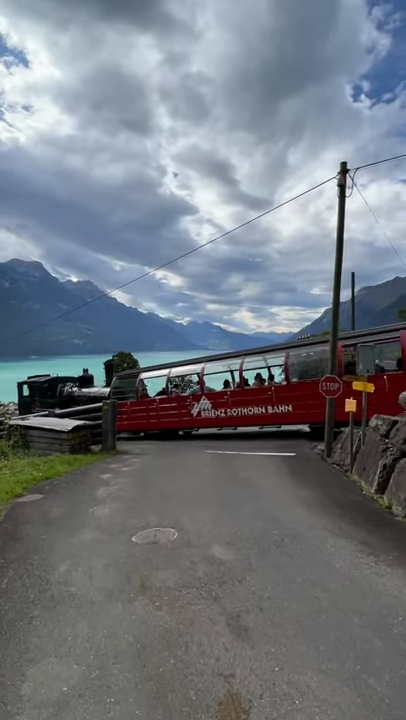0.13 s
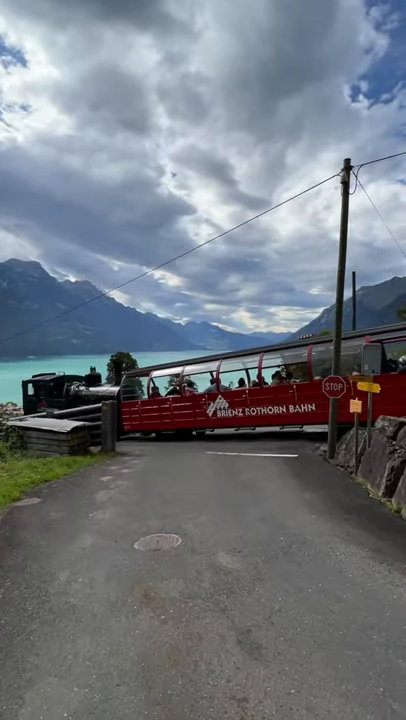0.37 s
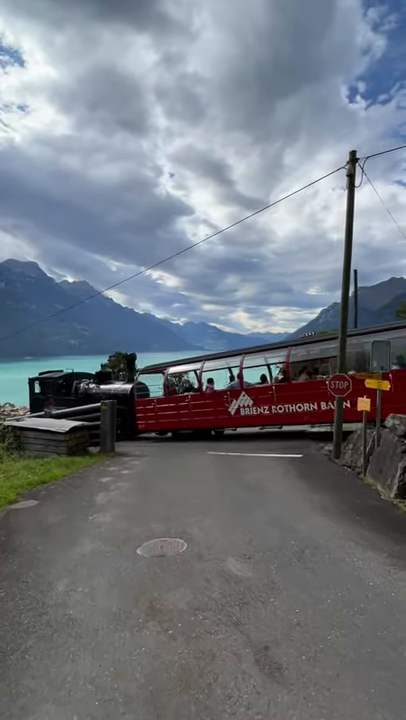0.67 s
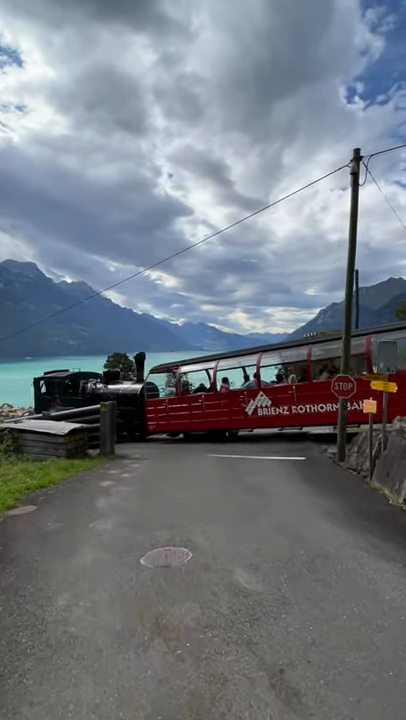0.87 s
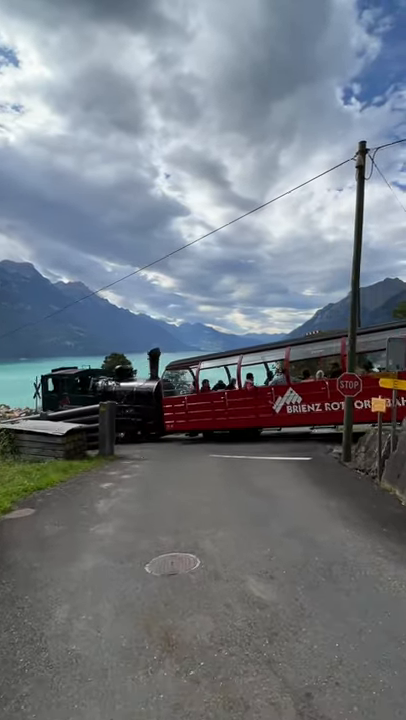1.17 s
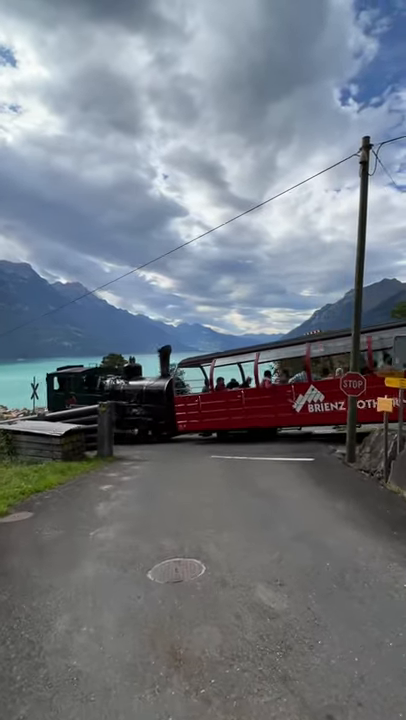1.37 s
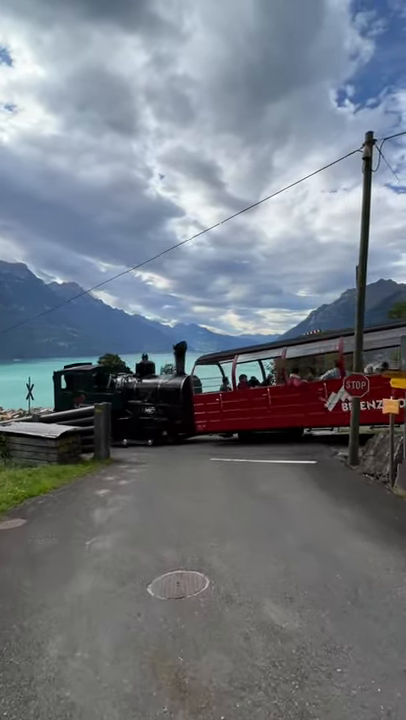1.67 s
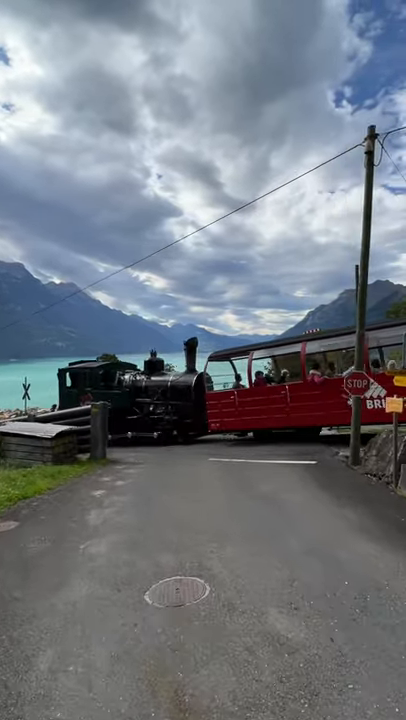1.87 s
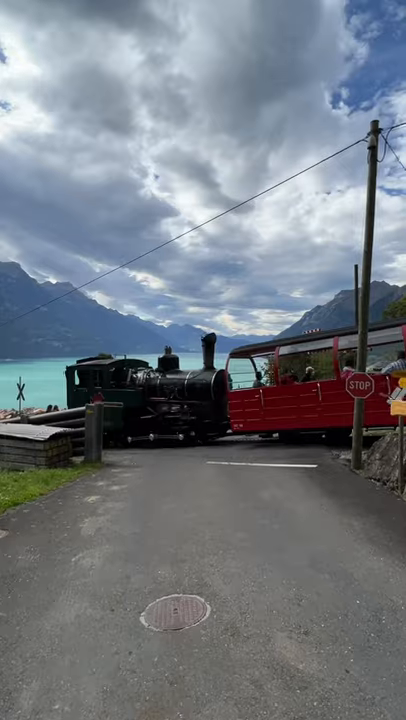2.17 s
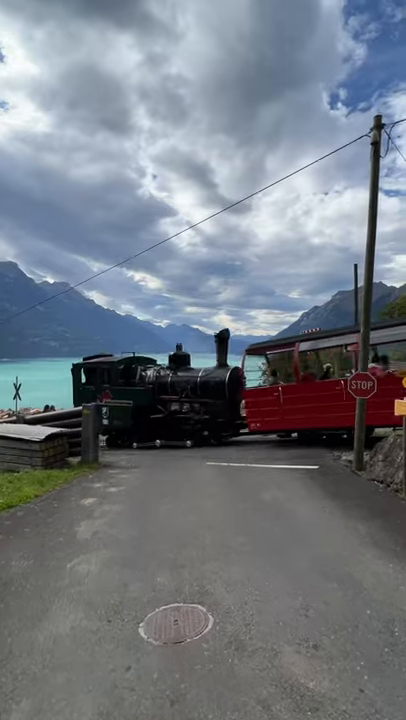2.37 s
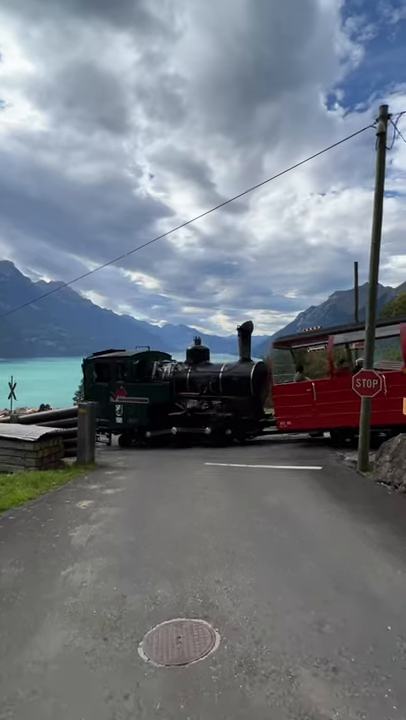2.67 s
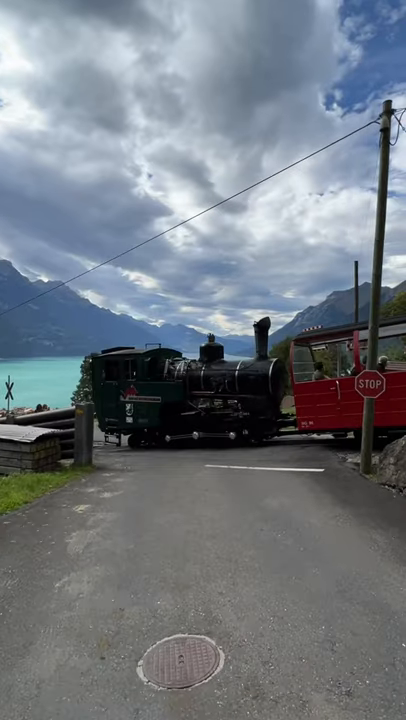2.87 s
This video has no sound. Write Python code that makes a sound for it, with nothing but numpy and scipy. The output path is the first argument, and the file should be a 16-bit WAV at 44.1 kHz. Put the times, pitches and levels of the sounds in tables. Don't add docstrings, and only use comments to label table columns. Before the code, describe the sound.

Fast, uneven-accented steam chuffs run without a break, about thirteen each second, while wheels and rods rumble and steam leaks underneath; open road crossing, nearby stereo handheld microphone, with a faint dull road reflection.

```python
import sys
import numpy as np
from scipy import signal
from scipy.fft import rfft, irfft
from scipy.io import wavfile
from scipy.ndimage import uniform_filter1d, minimum_filter1d

SR = 44100
rng = np.random.default_rng(int(sys.argv[2]) if len(sys.argv) > 2 else 0)


def master(y):
    cut = np.clip(np.atleast_2d(y).T, -1, 1)
    pcm = np.round(cut * 32767)
    wavfile.write(sys.argv[1], SR, pcm.astype(np.int16))


def gain_from_decibels(decibels):
    exponent = np.asarray(decibels, float) / 20
    return 10 ** exponent


N = 132741

# start in seconds, jet level in dB, bark level in dB, chimney overtone in dB, frame shake in dB.
EARLY_BEATS = [(0.0257, -9.5, -14.5, -10, -12.5), (0.1013, -17.5, -23.5, -16.5, -26),
               (0.176, -17.5, -20.5, -20, -45), (0.2534, -13, -7, -11, -35), (0.328, -9, -12, -9, -35),
               (0.402, -15.5, -23, -13, -24), (0.4781, -15.5, -17, -18, -32),
               (0.556, -10.5, -8.5, -10, -35), (0.631, -8, -12.5, -10.5, -42),
               (0.704, -16.5, -23.5, -28, -29), (0.779, -15.5, -30, -21, -26),
               (0.8585, -10, -11.5, -10.5, -36), (0.934, -9.5, -11, -19, -33), (1.0012, -20, -19, -28, -26),
               (1.0767, -17.5, -41, -19, -22), (1.1527, -8, -17, -10, -31), (1.2286, -8, -17.5, -7, -13.5),
               (1.299, -17, -25.5, -42, -23), (1.376, -15.5, -17, -40, -26),
               (1.4501, -9.5, -10.5, -26, -29)]
LATE_BEATS = [(1.5257, -8, -15, -9.5, -18), (1.5966, -16.5, -23, -36, -16),
              (1.6677, -14.5, -26.5, -17.5, -47), (1.7482, -9.5, -13.5, -15.5, -25),
              (1.818, -8, -20.5, -12, -20), (1.8903, -15.5, -29, -33, -44), (1.9635, -17, -31, -35, -28),
              (2.0427, -9.5, -18.5, -20, -43), (2.1165, -9, -14.5, -17.5, -35),
              (2.19, -20.5, -24, -14.5, -30), (2.261, -17.5, -40, -41, -17), (2.3405, -12.5, -15, -16, -35),
              (2.4144, -11, -17, -11, -22), (2.4901, -14, -35, -20, -31), (2.5648, -16, -25, -19.5, -14),
              (2.6419, -10, -23, -16, -42), (2.72, -9, -42, -25, -7), (2.797, -16.5, -23.5, -24, -43),
              (2.8725, -14, -21, -43, -45), (2.955, -9, -42, -40, -11)]
BEATS = [*EARLY_BEATS, *LATE_BEATS]


def evened(x):
    return x / np.sqrt(np.mean(x ** 2) + 1e-20)


def along(points):
    s, value = np.transpose(points)
    return np.interp(np.arange(N) / SR, s, value)


def read(points, hz):
    f, value = np.transpose(points)
    return np.interp(np.log(hz + 1), np.log(f + 1), value)


def colour(x, points):
    return irfft(rfft(x) * gain_from_decibels(read(points, np.fft.rfftfreq(N, 1 / SR))), N)


def resonate(x, hz, width):
    turn = np.exp(2j * np.pi * np.cumsum(hz * np.ones(N)) / SR)
    r = np.exp(-np.pi * width / SR)
    return 2 * (turn * signal.lfilter([1 - r], [1, -r], x / turn)).real


def wander(size):
    return evened(uniform_filter1d(uniform_filter1d(rng.standard_normal(N), size), size))


def puff(t, rise, fall):
    return np.sin(np.pi / 2 * np.clip(t / rise, 0, 1)) ** 2 * gain_from_decibels(-fall * np.maximum(t - rise, 0))


def beats(part, shape):
    # lead in seconds, rise in seconds, jet fall in dB per second, thump delay in seconds.
    valves = [
        (0.011, 0.018, 402, 0.0002),
        (0.011, 0.02, 367, -0.0015),
        (0.013, 0.017, 346, -0.0005),
        (0.011, 0.018, 417, 0.0003),
    ]
    # delay in seconds, rise in seconds, clear ring in dB.
    strikes = [(0.0037, 0.0049, 7.5), (0.0075, 0.012, 8.5), (0.0042, 0.015, 3), (0.0019, 0.0057, 1)]
    # thump in dB, hiss tilt in dB.
    blows = [(-13.5, 1), (-25, 3.3), (-20.5, -0.5), (-16.5, -0.3), (-17, -1), (-19, 1.8), (-17.5, 0),
             (-13.5, -0.8), (-15.5, 0.5), (-21, 0.5), (-18, -0.3), (-13, -0.4), (-20, -0.2), (-15.5, 4.2),
             (-19, 2), (-16.5, -3.5), (-22, 0.3), (-19, 3.5), (-29, -0.1), (-15.5, -0.2), (-18, -1.2),
             (-23, .1), (-30, -1.2), (-14, -3.4), (-24, -0.4), (-25, -1.5), (-17.5, 1), (-19, -5),
             (-13.5, -1.2), (-23, 3.5), (-20.5, .1), (-19.5, 1.8), (-16.5, 3.7), (-27, -3.8), (-20, .1),
             (-27, -0.3), (-19, 2), (-18, -0.8), (-22, -1.7), (-24, -4.5)]
    names = ("lead", "rise", "fall", "thump_delay", "ring_delay", "ring_rise", "ring_db")
    out, t = np.zeros(N + SR), np.arange(SR // 4) / SR
    for k, (start, jet_db, bark_db, overtone_db, shake_db) in enumerate(BEATS):
        valve = dict(zip(names, (*valves[k % 4], *strikes[k % 4])))
        thump_db, tilt_db = blows[k]
        level = dict(jet=jet_db, bark=bark_db, overtone=overtone_db, shake=shake_db,
                     thump=thump_db, treble=jet_db + tilt_db)[part]
        at = round((start - valve["lead"]) * SR)
        out[at:at + len(t)] += gain_from_decibels(level) * shape(t, valve)
    return out[:N]


def hums():
    # pitch in Hz, width in Hz, level in dB, loudest moment in seconds, span in seconds.
    hum_modes = [(40.8, 14, -6.5, 0.6, 2.25), (49.6, 41, -10, 0.66, 1.96), (205, 31.4, -10.5, 1.62, 0.8),
                 (304, 53, -10.5, 2.12, 1.35), (422, 84, -8, 2.25, 0.78), (1280, 170, -42, 0.33, 0.53),
                 (2480, 490, -19.5, .3, 2.4)]
    t, out = np.arange(N) / SR, 0
    for hz, width, db, loudest, span in hum_modes:
        noise = rng.standard_normal((2, N))
        fuzz = evened(resonate(resonate(noise, hz, width), hz, width))
        out = out + gain_from_decibels(db + 1) * np.exp(-.5 * ((t - loudest) / span) ** 2) * fuzz
    return out


def wash():
    # frequency in Hz, level in dB.
    gear_spectrum = [(50, -3), (150, -7), (300, -13.5), (1200, -16), (2600, -38), (5000, -36.5),
                     (10000, -43), (15500, -42.5)]
    frames = N // 256 + 5
    a, b, c, d, patches = rng.standard_normal((frames, 513, 5)).T
    patches = evened(uniform_filter1d(uniform_filter1d(patches, size=10, axis=0), size=6, axis=1))
    z = np.array([a + 1j * b, c + 1j * d]) * gain_from_decibels(3.5 * patches)
    rumble = evened(colour(signal.istft(z, nperseg=1024, noverlap=768)[1][:, :N], gear_spectrum))
    leak_hz, leak_rise_db, spit_db = 2220, 4.5, 0.5
    leak = signal.sosfiltfilt(signal.butter(2, leak_hz, "high", fs=SR, output="sos"), rumble)
    leak_gain = gain_from_decibels(leak_rise_db * np.arange(N) / N + spit_db * wander(150))
    return rumble + (leak_gain - 1) * leak


def gear():
    # time in seconds, level in dB.
    gear_level = [(0, -23), (.5, -26.5), (1.0, -24.5), (1.5, -25), (2.0, -25), (2.5, -24), (3.0, -26)]
    drone_hz, drone_width_hz, drone_db, drone_fade_db = 148, 5.6, -5.5, -8.5
    drone = evened(resonate(rng.standard_normal((2, N)), drone_hz, drone_width_hz))
    drone = gain_from_decibels(drone_db + drone_fade_db * np.arange(N) / N) * drone
    shake = 1 + 3.7 * beats("shake", lambda t, v: puff(t, 0.0037, 230))
    hum_surge = 1 + 2.3 * beats("jet", lambda t, v: puff(t, 0.016, 300))
    return shake * gain_from_decibels(along(gear_level) - 1.5) * (wash() + drone + hums() * hum_surge)


def road(x):
    # time in seconds, echo delay in seconds.
    echo_delay = [(0, 0.0014), (1.5, 0.00195), (3.0, 0.002595)]
    echo, echo_hz = 0.41, 1720
    dull = signal.lfilter(*signal.butter(1, echo_hz, fs=SR), x)
    at = np.arange(N) - along(echo_delay) * SR
    return x + echo * np.array([np.interp(at, np.arange(N), v) for v in dull])


def pipe():
    # pitch in Hz, 60 dB decay in seconds, level in dB, first swing in seconds,
    # swell lead in seconds, swell in seconds.
    chimney_modes = [
        (54, 0.17, 2.5, .0001, 0.0027, 0.0073),
        (146.5, 0.17, -3, .0023, 0.0052, 0.0097),
    ]

    def ring(hz, t60, db, first, lead, swell):
        def shape(t, v):
            since = t - v["lead"] - v["thump_delay"]
            swing = np.sin(2 * np.pi * hz * (since - first))
            return -gain_from_decibels(db) * puff(since + lead, swell, 60 / t60) * swing
        return shape

    return beats("thump", ring(*chimney_modes[0])) + beats("overtone", ring(*chimney_modes[1]))


def bark():
    nozzle_pitch = [570, 629, 640, 580, 570, 624, 576, 570, 655, 630, 560, 554, 525, 549, 565, 500, 522,
                    470, 549, 527, 580, 420, 560, 500, 580, 560, 420, 500, 505, 403, 420, 425, 409, 290,
                    285, 490, 450, 295, 290, 420]
    level_db, width_hz, burst_fall, ring_fall = 2, 343, 430, 1060
    ring_spread = 0.05015
    hz = along([(row[0] + s, pitch) for row, pitch in zip(BEATS, nozzle_pitch) for s in (-.01, .03)])

    def burst_shape(t, v):
        return puff(t - v["ring_delay"], v["ring_rise"], burst_fall)

    def ring_shape(t, v):
        return gain_from_decibels(v["ring_db"]) * puff(t - v["ring_delay"], v["ring_rise"], ring_fall)

    burst = rng.standard_normal((2, N)) * beats("bark", burst_shape)
    rough = gain_from_decibels(level_db + 10.5) * resonate(resonate(burst, hz, width_hz), hz, width_hz)
    phase = 2 * np.pi * np.cumsum(hz * (1 + ring_spread * wander(400))) / SR
    tone = np.sin(phase + np.array([[0], [np.pi / 2]]))
    return rough + tone * beats("bark", ring_shape)


def crackle():
    snaps_per_s, snap_db, spread_db = 1300, -9.5, 3.5
    sizes = gain_from_decibels(spread_db * np.minimum(rng.exponential(1, (2, N)), 4))
    snaps = (rng.random((2, N)) < snaps_per_s / SR) * sizes * rng.choice([-1., 1.], (2, N))
    return rng.standard_normal((2, N)) + gain_from_decibels(snap_db) * evened(snaps)


def eddies(x):
    z = signal.stft(x, nperseg=512, noverlap=384)[2]
    patches = rng.standard_normal(z.shape[1:])
    patches = evened(uniform_filter1d(uniform_filter1d(patches, size=7, axis=1), size=2, axis=0))
    eddy_db = 2.5
    return signal.istft(z * gain_from_decibels(eddy_db * patches), nperseg=512, noverlap=384)[1][:, :N]


def blast(t, rise, fall):
    linger_db, linger_fall, quick = -11, 218, 1.21
    return puff(t, rise, fall * quick) + gain_from_decibels(linger_db) * puff(t, rise, linger_fall * fall / 400)


def jet():
    # frequency in Hz, level in dB.
    jet_spectrum = [(330, -5.5), (560, 1), (1200, -1.5), (2600, -9.5), (6000, -19.5), (10200, -26),
                    (12200, -23), (15500, -33)]
    # pitch in Hz, width in Hz, level in dB.
    stack_modes = [(1200, 260, -4.5), (2690, 380, -8), (3350, 380, -9), (4400, 740, -15)]
    jet_db, treble_hz, treble_fall, gust_db, gust_s = -5.5, 2070, 1.376, 1.5, 0.0045
    raw = crackle()
    stack = sum(gain_from_decibels(db - 6) * resonate(raw, hz, width) for hz, width, db in stack_modes)
    steam = evened(eddies(colour(raw, jet_spectrum) + stack))
    low = signal.sosfiltfilt(signal.butter(2, treble_hz, fs=SR, output="sos"), steam)
    treble = steam - low
    gust = gain_from_decibels(gust_db * wander(int(gust_s * SR)))
    low = low * beats("jet", lambda t, v: blast(t, v["rise"], v["fall"]))
    treble = treble * beats("treble", lambda t, v: blast(t, v["rise"], v["fall"] * treble_fall))
    return gain_from_decibels(jet_db) * gust * (low + treble)


def scene():
    return road(jet()) + bark() + pipe() + gear()


def centre_cut(left, right):
    # start in seconds, length in seconds, top in Hz.
    openings = [(0.305, 0.013, 15900), (0.578, .03, 13400), (0.841, 0.03, 15900), (1.082, 0.034, 14800),
                (1.541, 0.022, 15700), (1.75, 0.034, 14900), (1.805, 0.019, 15900)]
    edge_hz, rag_hz, open_db = 11650, 950, -6
    hz, t, z = signal.stft((left + right) / 2, SR, nperseg=512, noverlap=384)
    rag = np.repeat(rng.random(len(t) // 8 + 1) ** 2, 8)[:len(t)]
    top = edge_hz + rag_hz * rag
    for s, length, open_hz in openings:
        top = np.where((t > s) & (t < s + length), open_hz, top)
    hz = hz[:, None]
    z = z * (hz < top) * np.where(hz > edge_hz + rag_hz, gain_from_decibels(open_db), 1)
    centre = signal.istft(z, SR, nperseg=512, noverlap=384)[1][:N]
    return centre + np.array([[.5], [-.5]]) * (left - right)


def limit(x):
    room = np.minimum(.94 / (abs(x).max(0) + 1e-9), 1)
    return x * uniform_filter1d(minimum_filter1d(room, size=257), size=129)


def top_cut(x):
    return signal.sosfilt(signal.butter(12, 15850, fs=SR, output="sos"), x)


def record(dry):
    # frequency in Hz, likeness from 0 to 1.
    bass_same = [(50, .9999), (100, .9992)]
    upper_same = [(330, 0.93), (800, 1), (1300, 1), (1600, 0.36), (2400, 0.39), (3200, 0.59), (7000, 0.69),
                  (10000, 0.63)]
    # frequency in Hz, lead of the left port in radians.
    left_lead = [(250, 0.16), (400, 1.58), (700, 1.1), (1000, 3.98), (2700, 9), (4250, 12.1), (5400, 6.97),
                 (11500, 3.81)]
    # frequency in Hz, level of the right port in dB.
    right_level = [(260, 3.5), (400, -2.5), (550, -8), (800, -2.5), (1200, -12.5), (2000, -1.5),
                   (4400, -1.5), (6000, -0.33)]
    ceiling, low_cut_hz, edge_hz, mono_hz = 1.5, 34, 15850, 170
    hz = np.fft.rfftfreq(N, 1 / SR)
    band = (hz < edge_hz) * hz ** 4 / np.sqrt(hz ** 8 + low_cut_hz ** 8)
    left, scattered = rfft(ceiling * np.tanh(dry / ceiling)) * band
    same = np.clip(read([*bass_same, (mono_hz, .999), *upper_same], hz), 0, 1)
    lag = np.exp(-1j * np.interp(hz, *np.transpose([(mono_hz - 20, 0), *left_lead])))
    shade = gain_from_decibels(read([(mono_hz - 20, 0), *right_level], hz))
    right = shade * (same * lag * left + np.sqrt(1 - same ** 2) * scattered)
    ports = centre_cut(*limit(irfft(np.array([left, right]), N)))
    return top_cut(ports)


dry = scene()
out = record(dry)
master(out)
```